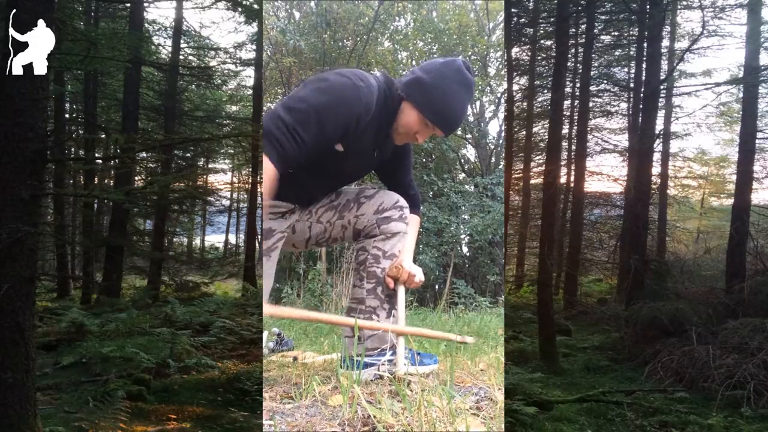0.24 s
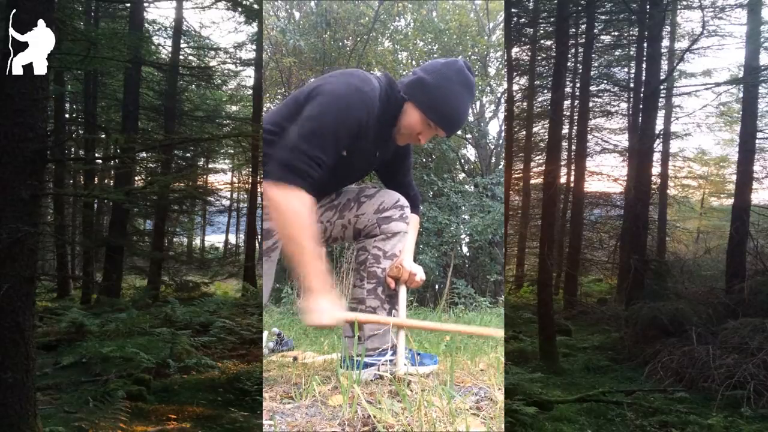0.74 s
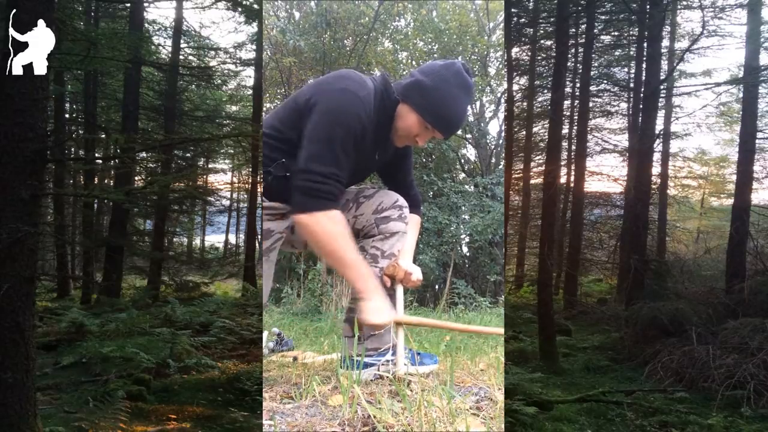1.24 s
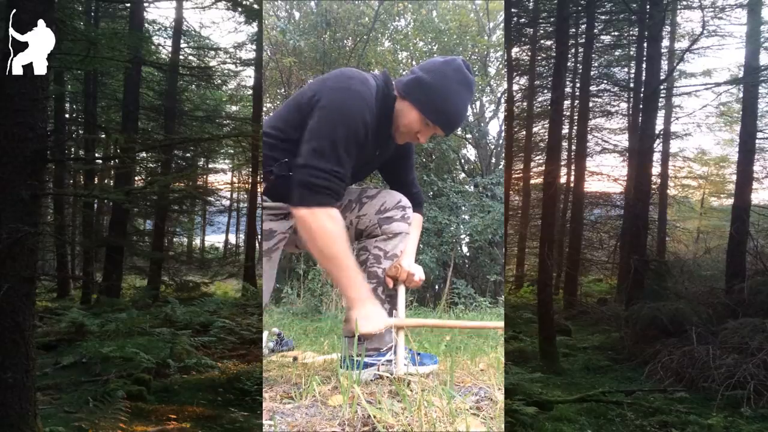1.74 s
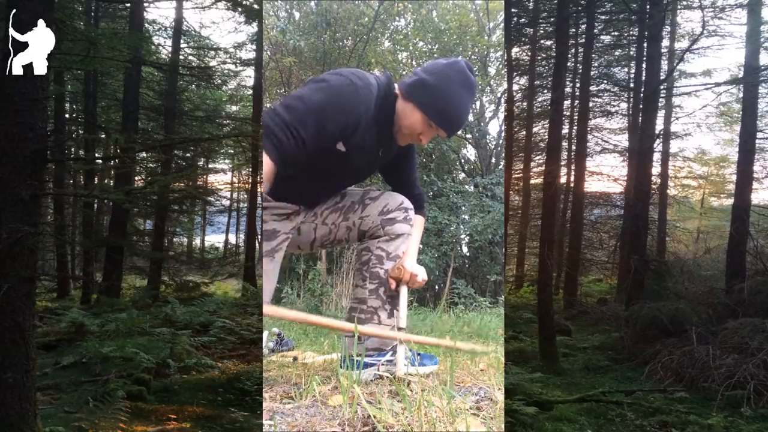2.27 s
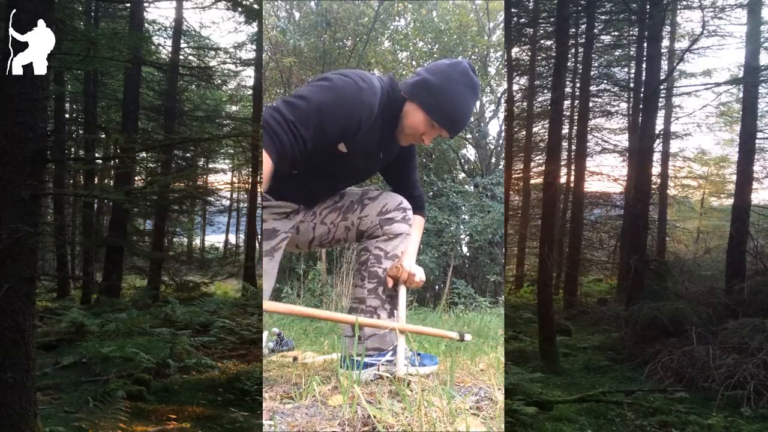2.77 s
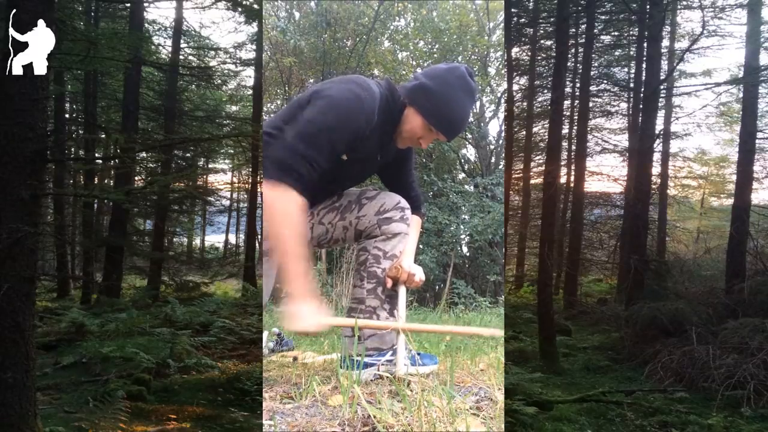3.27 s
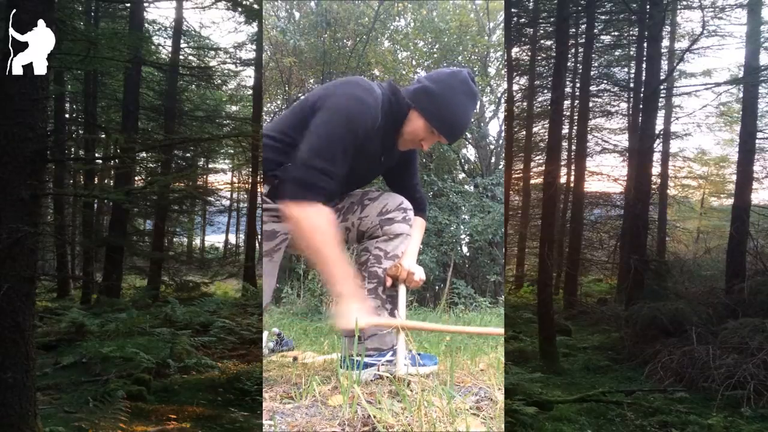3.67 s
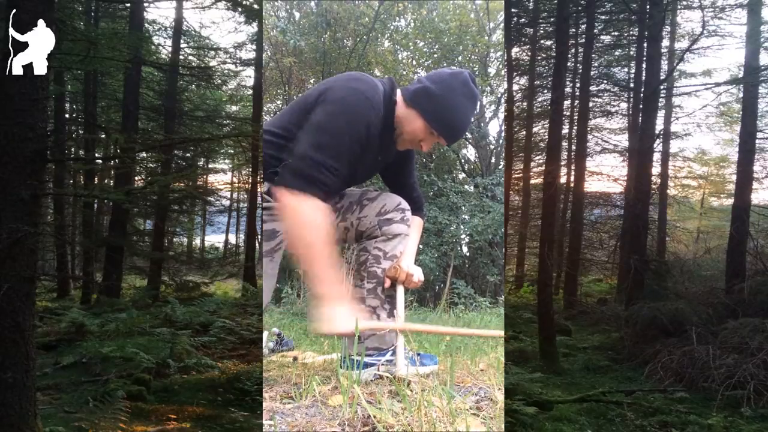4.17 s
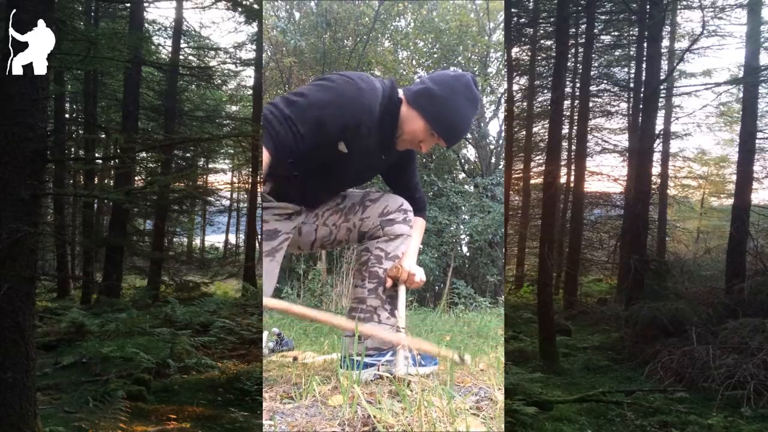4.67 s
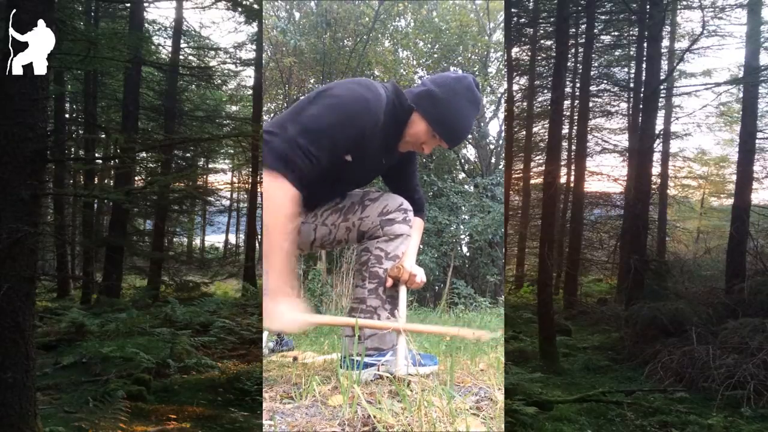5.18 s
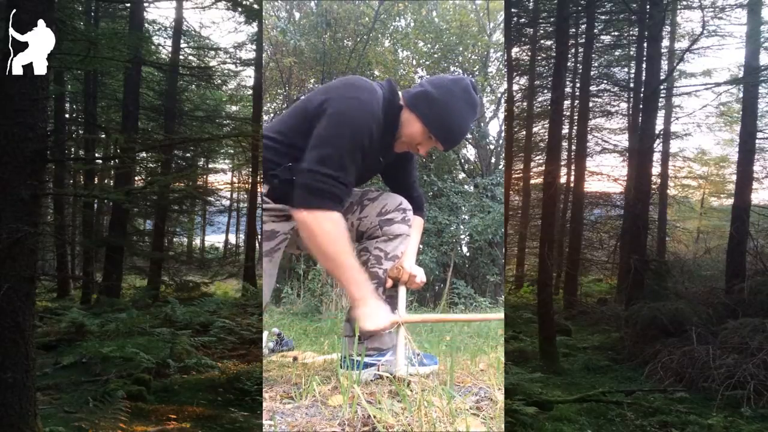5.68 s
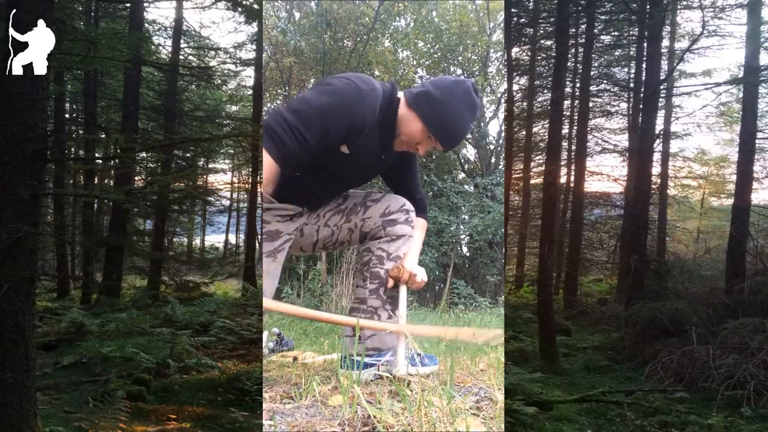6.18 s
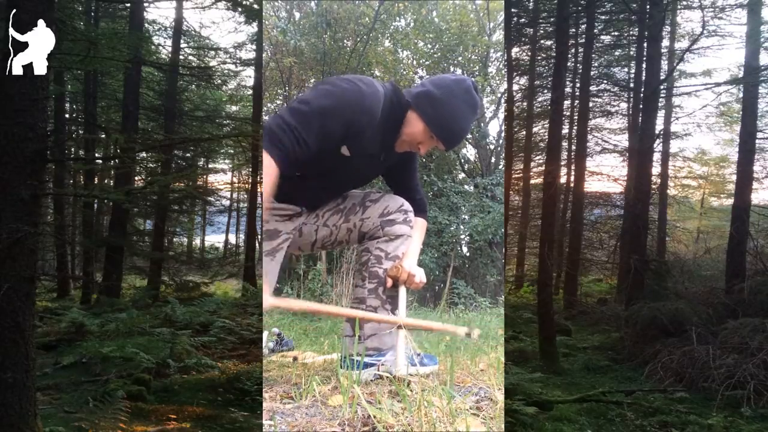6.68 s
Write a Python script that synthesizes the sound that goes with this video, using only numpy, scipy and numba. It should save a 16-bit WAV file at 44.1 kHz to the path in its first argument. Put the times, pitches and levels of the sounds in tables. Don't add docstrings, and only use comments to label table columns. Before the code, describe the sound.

From 0 to 7 seconds, a bow drill works steadily close to a phone microphone in a forest, about five single strokes each second, push and pull alternating. Every stroke swells from near silence into a dry, grainy rasp with a little dusty hiss. From 0.4 to 3.8 seconds many strokes grip into loud, short squeals near 1.9-2 kHz, some clean, others chattering and rough, notably around 1.3, 1.5, 2.0 and 2.35. Light knocks and ticks mark early turns. From 3.2 onward dry wooden clacks grow louder and frequent, with clusters near 4.0-4.1, 5.2, 5.6, 6.4 and 6.8, and cord ratchets in quick tick runs around 4.4, 5.15 and 5.9. Squeaks thin to brief lower chirps at 4.17, 4.56, 5.35, 5.73 and 6.14, while the rasp becomes stronger. Beneath lie faint distant hum and leaf hiss; trees return a thin, bright, quiet echo.

```python
import sys
import numpy as np
from scipy import signal
from scipy.io import wavfile
from scipy.ndimage import uniform_filter1d, minimum_filter1d
from numba import njit

SR = 44100
rng = np.random.default_rng(int(sys.argv[2]) if len(sys.argv) > 2 else 0)


def wav_record(signal):
    frames = np.transpose(np.atleast_2d(signal))
    bounded = np.clip(frames, -1, 1)
    quanta = np.round(bounded * 32767).astype(np.int16)
    wavfile.write(sys.argv[1], SR, quanta)


def amplitude_ratio(level_db):
    exponent = np.asarray(level_db, float) / 20
    return 10 ** exponent


N = 305172
T = np.arange(N) / SR


def level(x, db):
    return x * amplitude_ratio(db) / np.sqrt(np.mean(x ** 2))


def band(x, hz, width):
    return signal.lfilter(*signal.iirpeak(hz, hz / width, SR), x)


def highpass(x, hz):
    return signal.sosfilt(signal.butter(3, hz, "high", fs=SR, output="sos"), x)


def walk(rate):
    place = T * rate
    k = place.astype(int)
    share = (place - k) ** 2 * (3 - 2 * (place - k))
    draws = rng.standard_normal(size=8192)
    return draws[k] * (1 - share) + draws[k + 1] * share


def add(out, s, sound):
    i = int(s * SR)
    out[i:i + len(sound)] += sound[:N - i]


# f/Hz, level/dB per Hz
AIR = [(25, -22), (80, -10), (320, -4.5), (900, -14.5), (2000, -5), (5000, -33), (14800, -23)]


def forest():
    hz_points, db_points = np.transpose(AIR)
    air, swell = 0, walk(1.0)
    for hz in 30 * 2 ** np.arange(0, 9.1, .5):
        db = np.interp(np.log(hz), np.log(hz_points), db_points)
        db = db + 0.5 * swell + 2.0 * walk(4.4)
        noise = rng.standard_normal(N)
        air = air + amplitude_ratio(db) * band(band(noise, hz, hz / 2), hz, hz / 2)
    hum = amplitude_ratio(-61.5) * np.sin(2 * np.pi * 65 * T + .8 * walk(6.0))
    hum += amplitude_ratio(-67.0) * np.sin(2 * np.pi * 97 * T + 0.71 * walk(28))
    return (level(air, -58.0) + hum) * amplitude_ratio(1.03 * (T - 2.5))


@njit
def trunks(x, lags, gain, damp):
    line, soft, out = np.zeros((8, 4096)), np.zeros(8), np.zeros(len(x))
    for i in range(len(x)):
        total = 0.
        for k in range(8):
            soft[k] += (1 - damp) * (gain[k] * line[k, (i - lags[k]) & 4095] - soft[k])
            total += soft[k]
            out[i] += soft[k] * (1 - 2 * (k % 2))
        for k in range(8):
            line[k, i & 4095] = x[i] + soft[k] - total / 4
    return out


def ring(modes, detune, scatter_db):
    t = T[T < .08]
    out = np.zeros(len(t))
    for hz, db, t60 in modes:
        strength = amplitude_ratio(db + scatter_db * rng.standard_normal())
        pitch = hz * (1 + detune * rng.standard_normal())
        out += strength * np.exp(-np.log(1000) * t / t60) * np.sin(2 * np.pi * pitch * t)
    return out / np.abs(out).max()


def snap(length_s, decay_s, hz, width):
    t = T[T < length_s]
    burst = rng.standard_normal(len(t)) * np.exp(-t / decay_s)
    burst = band(band(burst, hz, width), hz, 1.24 * width)
    return burst / np.abs(burst).max()


# first tick t/s, ticks, spacing t/s, loudest level/dB, its place
RATCHETS = [
    (2.8134, 3, .011, -23, 2),
    (3.196, 2.94, 0.01, -19.5, .2),
    (3.952, 4, .0098, -19.5, 1.54),
    (4.3874, 4, .0117, -17, 1.97),
    (5.1482, 4.9, 0.01, -10.5, 2.9),
    (5.9207, 4, .0107, -11.5, 2.9),
]
# t/s, level/dB
TICKS = [(0.198, -28), (0.307, -29), (0.321, -25), (0.658, -32), (0.7372, -24), (0.768, -30), (1.0793, -33),
         (1.5129, -28), (1.567, -13.5), (1.6422, -20.5), (1.657, -34), (2.757, -35), (3.321, -21),
         (3.6238, -31), (3.6419, -27), (4.078, -30), (4.1528, -22), (4.764, -19), (4.928, -23),
         (4.958, -21.5), (5.2089, -19), (5.2528, -28.5), (5.277, -33.5), (5.312, -33), (6.1005, -17.5),
         (6.3041, -28.5), (6.503, -16.5), (6.7042, -16), (6.7442, -23), (6.8813, -22)]


def ticks():
    out = np.zeros(N)
    events = list(TICKS)
    for first, n, gap, db, loudest in RATCHETS:
        for k in range(round(n)):
            events.append((first + k * gap, db - 4.5 * abs(k - loudest)))
    for s, db in events:
        add(out, s, amplitude_ratio(db) * snap(.012, 0.001, 5560, 2570))
    return out


# f/Hz, level/dB, time to fall 60 dB t/s
BOW = [(801.6, -3, 0.019), (1305, 4, 0.014), (1785, -1, 0.016), (2315, -5.5, 0.018)]
# f/Hz, level/dB, time to fall 60 dB t/s
THUD = [(184, -4, 0.08), (413.7, 6, 0.047)]
# t/s, peak level/dB, thud level/dB, crack level/dB
KNOCKS = [(0.222, -14.5, -39, -39), (0.679, -15.5, -16.5, -12.5), (0.95, -27, -26, -24),
          (1.138, -19.5, -24, -19), (1.183, -14, -17, -43), (1.231, -16, -23, -14.5),
          (1.251, -13.5, -18.5, -26), (2.064, -12, -23, -8.5), (3.231, -5, -35, -13.5),
          (3.658, -29, -19, -19), (3.713, -17, -23, -16), (3.996, -7, -24, -9.5), (4.069, -5.5, -23, -8),
          (4.119, -5.5, -20, -11), (4.644, -34, -39, -14), (5.0287, -32.5, -25, -6),
          (5.201, -5.5, -21, -7.5), (5.597, -5, -22, -9), (5.966, -9.5, -22, -16), (6.2, -33.5, -32, -20),
          (6.364, -13, -26.5, -3), (6.41, -13.5, -18.5, -12.5), (6.517, -11, -18, -33),
          (6.762, -2, -27, -14.5)]
# t/s, peak level/dB
BUMPS = [(0.313, -37.5), (0.395, -26.5), (0.752, -15.5), (2.472, -27), (2.893, -32.5), (3.303, -14),
         (4.465, -38), (4.512, -26.5), (4.844, -20.5), (5.257, -16.5), (5.641, -21), (6.022, -35.5),
         (6.469, -26), (6.606, -32.5), (6.814, -23)]


def knocks():
    out = np.zeros(N)
    bumps = [(s, db, -17.5 - 0.34 * db, -8.5) for s, db in BUMPS]
    for s, db, thud_db, crack_db in KNOCKS + bumps:
        s += .0007
        add(out, s, amplitude_ratio(db + 4.5) * highpass(ring(BOW, .06, 3), 300))
        rebound_s = s + rng.uniform(.0008, 0.001777)
        add(out, rebound_s, amplitude_ratio(db - 0.5) * highpass(ring(BOW, 0.13, 6), 343))
        add(out, s, amplitude_ratio(db + thud_db + 8) * ring(THUD, .03, 1.5))
        add(out, s, amplitude_ratio(db + min(crack_db, -6) + 5.0) * snap(.012, 0.0017, 4440, 2900))
    return out


# from t/s, to t/s, board level/dB, spindle level/dB, dust level/dB
PUSHES = [(0.181, 0.225, -44.5, -37.5, -45), (0.628, 0.68, -41, -36, -46.5),
          (1.049, 1.089, -51, -41, -47.5), (1.478, 1.57, -36.5, -32.5, -29),
          (1.935, 1.991, -46, -30.5, -58), (2.327, 2.399, -41, -31.5, -47), (2.758, 2.808, -46, -28.5, -54),
          (3.156, 3.219, -40.5, -31, -44), (3.557, 3.613, -37.5, -30, -42),
          (3.929, 3.99, -37.5, -32.5, -43.5), (4.31, 4.406, -35.5, -32, -43),
          (4.712, 4.779, -34.5, -31, -38), (5.096, 5.197, -34, -33.5, -38.5),
          (5.491, 5.573, -33, -34, -43.5), (5.875, 5.959, -34.5, -34, -43.5), (6.262, 6.34, -35, -35, -45),
          (6.648, 6.735, -35, -38.5, -40.5)]
# from t/s, to t/s, board level/dB, spindle level/dB, dust level/dB
PULLS = [(0.0, 0.032, -52, -41, -32), (0.383, 0.446, -44, -31.5, -39), (0.8, 0.875, -45.5, -31, -40),
         (1.246, 1.309, -37, -30.5, -37), (1.699, 1.78, -52, -47, -48.5), (2.112, 2.189, -51, -31.5, -48),
         (2.534, 2.607, -48.5, -29, -48.5), (2.95, 3.019, -51, -41, -48.5),
         (3.35, 3.43, -42.5, -34.5, -38.5), (3.725, 3.792, -46, -28.5, -42),
         (4.12, 4.196, -39.5, -26.5, -42.5), (4.529, 4.596, -38.5, -35, -41.5),
         (4.914, 4.972, -39.5, -32, -35.5), (5.316, 5.372, -41, -31, -38.5), (5.709, 5.76, -40, -32, -42),
         (6.075, 6.137, -36.5, -31.5, -38.5), (6.47, 6.538, -37.5, -30.5, -40),
         (6.872, 6.93, -36.5, -34.5, -38.5)]


def strokes():
    turn_db = (-57.5, -63.5, -53)
    out = np.outer(turn_db, np.ones(N))
    for table, rise, fall, grows in ((PUSHES, 0.066, 0.048, (2, 8, 8.5)),
                                     (PULLS, 0.067, 0.05, (-3, 1.5, -3.5))):
        for start, end, *peaks in table:
            span = slice(max(int((start - rise) * SR), 0), int((end + fall) * SR))
            corners_s = [start - rise, start, end, end + fall]
            for row, rest, db, grow in zip(out, turn_db, peaks, grows):
                corners_db = [rest, db - grow / 2, db + grow / 2, rest]
                shape = np.interp(T[span], corners_s, corners_db)
                row[span] = np.maximum(row[span], shape)
    return out


# f/Hz, width f/Hz, level/dB, change on the pull level/dB
BOARD = [(793, 210, 0, -8), (935, 248, 1.5, -6), (1236, 180, -6.5, 7), (181, 294, -16, 8.5),
         (408, 220, -18, 6)]
# t/s, f/Hz
SPINDLE_HZ = [(0, 2180), (3.4, 2074), (4.3, 1853), (6.9, 1869)]


def rasp():
    board_db, spindle_db, dust_db = strokes()
    lobes = np.cos(2 * np.pi * np.cumsum(88 * (1 + 0.1937 * walk(30))) / SR)
    catches = rng.standard_normal(N) * amplitude_ratio(5.6 * lobes + 5.04 * walk(150))

    middles = [((a + b) / 2, 0) for a, b, *_ in PUSHES]
    middles += [((a + b) / 2, 1) for a, b, *_ in PULLS]
    pulling = np.interp(T, *np.transpose(sorted(middles)))
    board = np.zeros(N)
    for hz, width, db, pull_db in BOARD:
        tone = band(band(catches, hz, width), hz, width) / np.sqrt(width)
        board += amplitude_ratio(db + pull_db * pulling) * tone

    ring_hz = np.interp(T, *np.transpose(SPINDLE_HZ)) * (1 + 0.065 * walk(70))
    phase = 2 * np.pi * np.cumsum(ring_hz) / SR
    grains = walk(420) * np.sin(phase) + walk(420) * np.cos(phase)
    grains = grains * amplitude_ratio(2.8 * lobes + 1.5 * walk(90))
    spindle = level(grains, 0) + level(band(band(catches, 2240, 670), 2240, 670), -10.5)

    specks_db = 4.9 * np.minimum(rng.exponential(size=N), 6)
    dust = rng.standard_normal(N) * amplitude_ratio(specks_db + 0.75 * lobes + 1.7 * walk(60))
    dust = band(band(dust, 3550, 6600), 4130, 7400) + amplitude_ratio(-10.0) * highpass(dust, 8700)
    dust = level(highpass(dust, 1470), -5.0)

    board_db = board_db + 0.84 * np.clip(board_db + 49, -15, 0)
    spindle_db = spindle_db + 0.63 * np.clip(spindle_db + 47.5, -15, 0)
    dust_db = dust_db + 0.63 * np.clip(dust_db + 47.5, -15, 0)
    return level(board, 4.16) * amplitude_ratio(board_db) + spindle * amplitude_ratio(spindle_db) + dust * amplitude_ratio(dust_db)


# first grip t/s, last grip t/s, grips, level/dB, f/Hz
SQUEALS = [
    (0.419, 0.444, 3.22, 0.5, 1948),
    (0.8273, 0.873, 4.93, 2, 1990),
    (1.7173, 1.772, 4.1, -2, 1870),
    (2.135, 2.167, 3, -1.5, 2001),
    (2.5427, 2.6113, 6.32, -2.5, 1938),
    (2.9778, 3.0111, 4.2, -4, 2010),
    (3.3764, 3.4376, 5, -2.5, 1885),
    (3.7577, 3.7822, 2, -3, 1923),
]
# first grip t/s, grips, level/dB, f/Hz, half-pitch line level/dB
SCREECHES = [
    (1.2988, 1.99, -0.5, 2095, -32),
    (1.5251, 3.02, -6, 1900, -14),
    (1.953, 3.05, -1, 1963, -23),
    (2.3493, 3.14, -4, 1790, -17),
    (2.7805, 3, -1, 2010, -39),
    (3.589, 2.13, -5, 1870, -15.5),
]
# t/s, level/dB, f/Hz, half-pitch line level/dB
CHIRPS = [(0.0194, -3, 1960, -45), (0.0255, -3, 1900, -45), (0.662, -18, 2044, -33.5),
          (1.278, -17, 2400, -22), (2.963, -7, 2070, -35), (3.742, -13, 1990, -34.5),
          (3.9618, -20.5, 1900, -19), (3.9812, -14.5, 1880, -34.5), (4.168, 0, 1900, -25.5),
          (4.189, -13, 1842, -28), (4.2096, -15.5, 1884, -40.5), (4.3421, -19.5, 1918, -30.5),
          (4.3631, -18, 1750, -33.5), (4.5424, -17.5, 1913, -28), (4.5647, -6, 1840, -34),
          (4.5833, -14, 1870, -18), (5.353, -1.5, 1826, -39), (5.7312, -1, 1825, -39),
          (6.0971, -10.5, 1924, -37), (6.113, -10.5, 1960, -36.5), (6.1238, -8.5, 1907, -19.5),
          (6.1409, -1, 1818, -39)]


def grips():
    rows = [(s, db, hz, .0085, half_db) for s, db, hz, half_db in CHIRPS]
    for first, last, n, db, hz in SQUEALS:
        for u in np.linspace(0, 1, round(n)):
            since_s = u * (last - first)
            pitch = hz * (1 - .05 * np.sin(np.pi * min(since_s / 0.056, 1) ** .7))
            length_s = .85 * (last - first) / max(n - 1, 2) if u else .009
            rows.append((first + since_s, db + 1.5 * (u == 0), pitch, length_s, -42))
    gap_s, grip_s = .012, .0082
    for first, n, db, hz, half_db in SCREECHES:
        rows.append((first - gap_s, db - 15, hz * (1 + .04), grip_s, half_db - 6))
        for k in range(round(n)):
            rows.append((first + k * gap_s, db + k * 0.2, hz * (1 - k * 0.0056), grip_s, half_db + k * 5))
    s, db, hz, length_s, half_db = np.transpose(sorted(rows))
    chance = rng.standard_normal((len(s), 2)).T
    return s, db + .8 * chance[0], hz * (1 + .01 * chance[1]), length_s, half_db


# multiple of f, level/dB
OVERTONES = [(2, -13), (3, -17.5), (4, -23), (5, -34.5), (6, -40), (7, -47.5), (8, -52)]
# multiple of the slow f, level/dB
SKIPS = [(1, -2), (2, -2.5), (3, 0), (4, 1.5), (5, -9), (7, -11)]


def squeak():
    s, db, hz, length_s, half_db = grips()
    power, sag = np.zeros(N), np.zeros(N)
    drift = np.clip((-36 - half_db) / 10, -.6, 1)
    for centre, peak_db, width, slope in zip(s, db, length_s, drift):
        t = T[max(int((centre - .05) * SR), 0):int((centre + .05) * SR)]
        bump = np.exp(-((t - centre) / (.43 * width)) ** 2)
        onset = (t < centre) * amplitude_ratio(-18.5) * np.exp((t - centre) / 0.0036)
        bump = amplitude_ratio(2 * peak_db) * (bump + onset)
        add(power, t[0] + .5 / SR, bump)
        add(sag, t[0] + .5 / SR, slope * bump * np.clip((t - centre) / width, -1, 1))
    size = np.sqrt(power) * amplitude_ratio(2.68 * walk(300))
    size_db = 20 * np.log10(size + 1e-4)

    sag = .1 * sag / (power + 1e-5)
    sharp = .004 * np.clip(-12 - size_db, 0, 30)
    pitch = np.interp(T, s, hz) * (1 - sag + 0.028 * walk(230) + sharp)
    phase = 2 * np.pi * np.cumsum(pitch) / SR

    swing_db = signal.lfilter([.005], [1, -.995], size_db + 4)
    bite_db = -.03 * (pitch - 1850) + 1.07 * swing_db
    skip_db = np.interp(T, s, half_db)
    tone = np.sin(phase + 3.15 * amplitude_ratio(skip_db) * walk(700))
    for k, over_db in OVERTONES:
        strength = amplitude_ratio(over_db + bite_db * min(k / 3.9, 1.6) + 4.37 * walk(350))
        tone += strength * np.sin(k * phase + 0.27 * k * walk(700) + 1.5)

    every = np.where((T > 1.535) & (T < 1.565), 3, 2)
    slow = 2 * np.pi * np.cumsum(pitch / every * (1 + 0.051 * walk(400))) / SR
    for k, line_db in SKIPS:
        strength = amplitude_ratio(line_db + skip_db + 6.35 * walk(300))
        tone += (k % every > 0) * strength * np.sin(k * slow)

    grit = highpass(rng.standard_normal(N), 1650)
    grit = band(grit, 5750, 3700) + amplitude_ratio(-46) * grit
    grit_gain = amplitude_ratio(-20.5 + 0.43 * bite_db) + amplitude_ratio(skip_db - 18)
    return size * (tone + grit * grit_gain * amplitude_ratio(2.0 * walk(280)))


def scene():
    rub, blows = squeak() + rasp(), knocks() + ticks()
    drill = rub + blows
    bright = highpass(highpass(rub + blows / 2, 3200), 3140) + amplitude_ratio(-27.0) * drill
    smeared = bright * (1.1 + .9 * walk(420))
    lags = rng.integers(700, 2600, 8)
    echo = trunks(smeared, lags, amplitude_ratio(-60 * lags / SR / 0.67), 0.58)
    return (drill + amplitude_ratio(-25.5) * echo + forest())[None]


def band_limit(x):
    return signal.sosfilt(signal.butter(12, 16460, fs=SR, output="sos"), x)


def record(dry):
    x = highpass(dry, 57)
    x = x - 0.6 * band(x, 7200, 2370)
    x = signal.sosfilt(signal.ellip(8, .2, 60, 15300, fs=SR, output="sos"), x)
    room = minimum_filter1d(np.minimum(1, 1 / (np.abs(x) + 1e-9)), size=129)
    return band_limit(x * uniform_filter1d(room, size=65))


dry = scene()
out = record(dry)
wav_record(out)
```